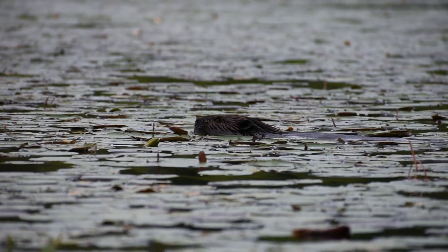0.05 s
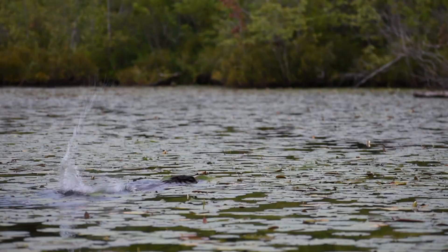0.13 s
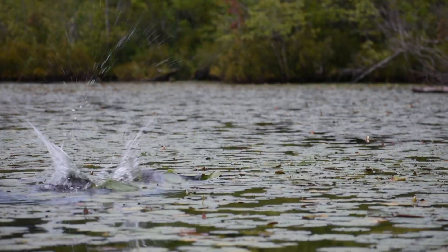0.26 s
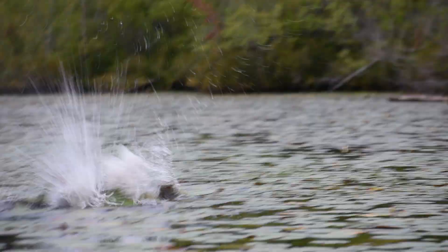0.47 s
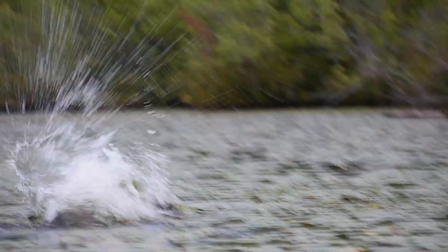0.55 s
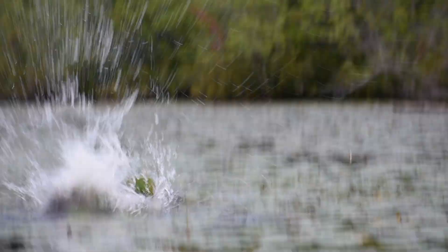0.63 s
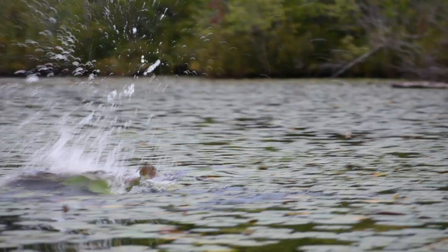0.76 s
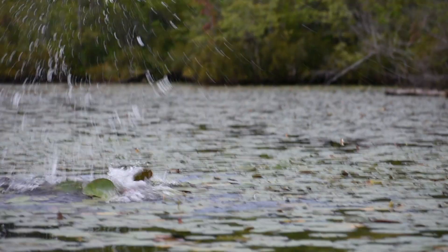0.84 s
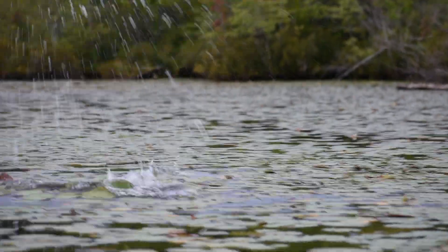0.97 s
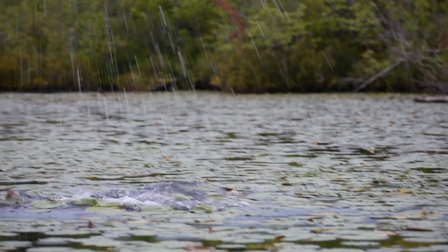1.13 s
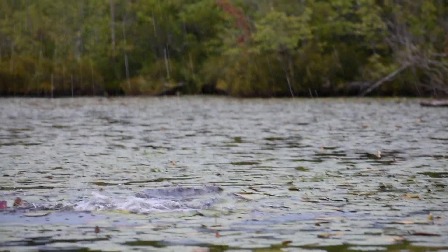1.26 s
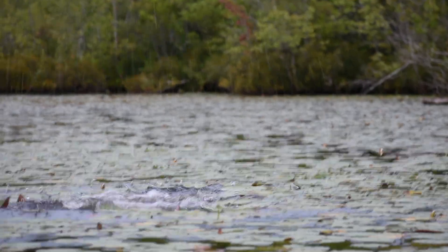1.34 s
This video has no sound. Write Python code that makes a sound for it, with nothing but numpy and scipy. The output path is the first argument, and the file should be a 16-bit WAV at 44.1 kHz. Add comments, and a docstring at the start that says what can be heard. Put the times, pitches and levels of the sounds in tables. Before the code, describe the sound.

A loud, sharp smack on water as a beaver's tail hits a quiet lake, heard on a single microphone. Spray hisses briefly, then the diving body splashes, and churning bubbles fade into a light patter of droplets.

```python
"""A still lake, with faint insects and shore air behind, heard on one microphone.
A beaver slaps its tail on the water: a crack that drops into a hollow pop as air is squeezed from under
the tail, then a hiss of flung spray. It plunges: the water thumps, churns with ringing bubbles and falls
back, thinning to single chirping drops. The slap is just loud enough to overload the recorder."""
import sys
import numpy as np
from scipy import signal
from scipy.fft import rfft, irfft, next_fast_len
from scipy.io import wavfile

SR = 44100
rng = np.random.default_rng(int(sys.argv[2]) if len(sys.argv) > 2 else 0)


def dump(signal):
    """Clip the signal to [-1, 1] and save it as 16-bit WAV at the path in sys.argv[1]."""
    limited = np.clip(np.atleast_2d(signal).T, -1, 1)
    pcm = np.round(limited * 32767).astype(np.int16)
    wavfile.write(sys.argv[1], SR, pcm)


N = 61739

PLUNGE_S, PLUNGE_RISE_S = 0.462, 0.0029
TOP_HZ = 16100  # the recorder's band limit


def slap():
    """The flat tail hits: a crack, a clap, and squeezed air falling to the trapped pocket's note."""
    crack_colour = [(100, -22), (400, -1.5), (2200, -7), (4500, -1), (7000, -2), (10000, -12),
                    (12700, -6.5), (16000, -19)]  # spectrum of the impact (frequency [Hz], level [dB])
    pop_s, pop_rise_s, pop_fall_s = 0.2295, 0.0015, 0.0025
    pocket_hz, squeeze_hz, squeeze_fall_s = 664, 122, 0.00052
    crack_s, crack_rise_s, crack_fall_s = 0.2278, 0.0012, 0.0021
    clap_s, clap_hz, clap_width_s = 0.2286, 2080, 0.00059

    t = np.clip(clock() - pop_s, -0.004, 0.05)
    excess_hz = squeeze_hz * np.exp(-t / squeeze_fall_s)  # pitch above the pocket's note
    swell = np.exp(-(t / np.where(t < 0, pop_rise_s, pop_fall_s)) ** 2)
    gate = (excess_hz < TOP_HZ) * (clock() > pop_s + t[0])
    pop = swell * gate * np.sin(2 * np.pi * (pocket_hz * t - excess_hz * squeeze_fall_s))

    t = clock() - crack_s
    burst = np.exp(-np.where(t < 0, (t / crack_rise_s) ** 2, t / crack_fall_s))
    crack = burst * noise(crack_colour)

    t = clock() - clap_s
    clap = np.cos(2 * np.pi * clap_hz * t) * np.exp(-(t / clap_width_s) ** 2)
    return highpass(amp(-2.6) * pop + amp(-2.5) * clap + amp(-8) * crack, edge_hz=260)


def splash():
    """The body goes under with a crash; thrown water falls back as large and small bubbles and spray."""
    # relative levels of the churning water (time [s], large bubbles [dB], small bubbles [dB], spray [dB])
    surges = [(0.46, -44, -21.5, -29), (0.47, -23.5, -19.5, -21.5), (0.482, -36, -24, -29),
              (0.526, -31, -26, -31), (0.566, -37.5, -29.5, -39.5), (0.584, -31, -31, -38.5),
              (0.636, -37, -35, -39), (0.648, -31, -32.5, -38.5), (0.688, -34.5, -32, -34),
              (0.746, -32.5, -31, -37), (0.782, -40, -32.5, -35.5), (0.888, -41, -30.5, -33.5),
              (0.968, -42.5, -31, -35.5), (1.018, -44, -34.5, -35.5), (1.034, -48, -36.5, -40),
              (1.086, -45.5, -34, -36), (1.28, -54.5, -46.5, -45), (1.4, -50.5, -41.5, -40)]
    # spectra of the same three layers (frequency [Hz], level [dB])
    large_colour = [(60, -45), (130, -18.5), (240, -11), (380, -4.5), (520, -5.5), (730, 3.5), (900, -3),
                    (1300, -25), (2500, -62)]
    small_colour = [(400, -55), (750, -12), (1000, 0), (1700, 2), (2300, -3), (3000, -6), (4200, -16),
                    (8000, -50)]
    spray_colour = [(1400, -51), (2500, -6), (3300, 2), (4500, -0.5), (6700, -2), (9500, -10), (12500, -17),
                    (16000, -27)]
    # the crash starts as an even wash; single bubbles stand out only later
    wash_share = np.exp(-np.maximum(clock() - PLUNGE_S, 0) / 0.082)

    def churn(colour, **cloud):
        return np.sqrt(1 - wash_share) * bubbles(colour, **cloud) + np.sqrt(wash_share) * noise(colour)

    large = churn(large_colour, low_hz=219.6, high_hz=968, cycles=2.27, scatter=2, wash_db=5, count=900)
    small = churn(small_colour, low_hz=866, high_hz=3310, cycles=2.8, scatter=3, wash_db=0, count=1500)
    spray = churn(spray_colour, low_hz=2574, high_hz=13800, cycles=2.2, scatter=5.5, wash_db=-2.5,
                  count=3500)
    large_db, small_db, spray_db = curves(surges)
    water = amp(large_db + 0.5) * large + amp(small_db - 1) * small + amp(spray_db - 0.5) * spray
    return water * fade_in(PLUNGE_S, PLUNGE_RISE_S)


def gulps():
    """Lumps of water close with a wet smack over big pockets of air, which ring briefly."""
    # trapped air (time [s], starting pitch [Hz], level [dB], decay [s], smack relative to ring [dB])
    pockets = [(.2855, 760, -25.5, 0.0019, -8.5), (.379, 497, -28, 0.0037, -21),
               (.3912, 760, -13.5, 0.0018, -17), (.399, 1100, -24, 0.0024, -26),
               (.404, 1220, -13, 0.00075, -14), (.462, 345, -25.5, 0.015, -19),
               (.533, 399, -27, 0.015, -22), (.583, 816, -20, 0.0076, -14), (.611, 937, -19.5, 0.0049, -10),
               (.7386, 1164, -11.5, 0.0018, -26), (.737, 641, -22, 0.0093, -10),
               (0.812, 1550, -32, 0.0017, 13), (.881, 1760, -21, 0.0067, -13),
               (.9255, 2220, -23.5, 0.0025, 4), (.9555, 1140, -22.5, 0.0051, -6),
               (1.005, 596, -33, 0.024, -5), (1.123, 2820, -24, 0.0025, 4),
               (1.1686, 1130, -25, 0.0037, 2.5), (1.208, 3480, -28, 0.00091, 3.5),
               (1.373, 1070, -21.5, 0.001, -11)]
    smack_colour = [(200, -24), (700, -7.5), (1600, 1), (4000, 1.5), (7000, -5), (10000, -18), (16000, -26)]  # spectrum of the wet smack (frequency [Hz], level [dB])
    rise_per_s, attack_s, smack_decay_s = 2.8, 0.00045, 0.0024
    out, smack_noise = np.zeros(N), noise(smack_colour)
    for start_s, hz, db, decay_s, smack_db in pockets:
        t = np.maximum(clock() - start_s, 0)
        ring = np.sin(2 * np.pi * hz * t * (1 + rise_per_s * t / 2)) * np.exp(-t / decay_s)
        smack = amp(smack_db) * smack_noise * np.exp(-t / smack_decay_s)
        out += amp(db) * (ring + smack) * (1 - np.exp(-t / attack_s))
    return highpass(out, edge_hz=217)


def drops():
    """Single drops chirp, a few around the slap and most after the splash, over a finer patter."""
    # drops that stand out (time [s], pitch [Hz], level [dB], length [cycles])
    single_drops = [(0.2145, 6200, -22, 1.5), (0.2201, 3760, -42, 0.92), (.3515, 3270, -26, 2.9),
                    (.433, 7250, -22.5, 4.1), (0.901, 8900, -12.5, 1.8), (0.9353, 7400, -16, 3),
                    (1.079, 5500, -11, 0.67), (1.1525, 9000, -26, 3.7), (1.1845, 6200, -24, 5.7),
                    (1.191, 10100, -32, 5), (1.1998, 8950, -27, 5.6), (1.2115, 6700, -26, 7.8),
                    (1.233, 10100, -22.5, 4.5), (1.258, 6300, -23.5, 4.4), (1.2855, 9600, -26, 8.7),
                    (1.309, 8550, -28, 8.6), (1.3214, 3700, -21.5, 7.2), (1.335, 5906, -23.5, 6.8),
                    (1.3475, 7250, -25, 6.4), (1.3619, 11300, -20, 6), (1.3643, 11200, -28, 6),
                    (1.3899, 10600, -23, 8.4), (1.3912, 4560, -20, 2.2)]
    patter_levels = [(0.699, -51), (1.0, -34.5), (1.15, -31.5), (1.25, -31.5), (1.4, -29.5)]  # the smaller drops (time [s], typical level [dB])
    drops_per_s, typical_hz, cycles, scatter_db = 190, 8900, 4.6, 4
    times, levels = np.transpose(patter_levels)
    count = int(drops_per_s * (times[-1] - times[0]))
    pitch, size, jitter = rng.standard_normal((count, 3)).T
    landing_s = times[0] + (np.arange(count) + jitter) / drops_per_s
    db = np.interp(landing_s, times, levels) + scatter_db * np.minimum(size, 2)
    patter = chirps(landing_s, typical_hz * np.exp(0.39 * pitch), db, np.full(count, cycles))
    return patter + chirps(*np.transpose(single_drops))


def flung_spray():
    """Fine spray thrown by the tail hisses between the slap and the plunge."""
    flurries = [(0.238, -32.5), (0.248, -37.5), (0.374, -44), (0.404, -35), (0.414, -43.5), (0.434, -42.5),
                (0.44, -42), (0.455, -40.5)]  # spray in flight (time [s], relative level [dB])
    colour = [(88, -49), (150, -8), (774, 4.5), (2920, 0), (3220, -1.5), (7620, -3.5), (8730, -9),
              (12900, -11.5), (16000, -18)]  # spectrum of its hiss (frequency [Hz], level [dB])
    level_db, = curves(flurries)
    fizz = bubbles(colour, low_hz=693, high_hz=12400, cycles=3.1, scatter=4.5, wash_db=1.5, count=4000)
    gate = fade_in(0.222, rise_s=0.0015) * (1 - fade_in(PLUNGE_S, PLUNGE_RISE_S))
    return amp(level_db + 0.5) * fizz * gate


def mist():
    """The finest droplets come down as a soft, high sizzle."""
    showers = [(0.46, -48), (0.466, -42), (0.564, -47), (0.892, -47.5), (0.9, -26), (0.912, -44),
               (1.22, -49), (1.236, -43), (1.24, -47.5), (1.394, -43), (1.4, -45)]  # falling mist (time [s], relative level [dB])
    colour = [(4000, -40), (7000, 9), (9000, -8.5), (10500, -3.5), (12500, 2), (14500, -3.5), (16000, -14)]  # spectrum of its sizzle (frequency [Hz], level [dB])
    level_db, = curves(showers)
    fizz = bubbles(colour, low_hz=6840, high_hz=14900, cycles=3.2, scatter=4.5, wash_db=0, count=3000)
    return amp(level_db - 1.5) * fizz * fade_in(PLUNGE_S, PLUNGE_RISE_S)


def hollow():
    """The cavity behind the diving body thumps and closes with a rising note."""
    cavity = [(.462, 79.6, -50), (.478, 65, -42), (.52, 60, -56), (.57, 74, -58), (.605, 127, -53),
              (.635, 218, -60), (.72, 295, -62), (.78, 332, -64)]  # the cavity's note (time [s], pitch [Hz], level [dB])
    hz, level_db = curves(cavity)
    closed_s = cavity[-1][0]
    gate = fade_in(PLUNGE_S, PLUNGE_RISE_S) * (1 - fade_in(closed_s, rise_s=0.016))
    return gate * amp(level_db) * np.sin(2 * np.pi * np.cumsum(hz) / SR)


def shore():
    """Quiet air and a thin, steady band of insects lie in the background."""
    # spectra of the shore air and the insects (frequency [Hz], level [dB])
    air_colour = [(25, -14), (60, -12.5), (110, -16.5), (185, -3), (280, -4.5), (800, -5), (1500, -7.5),
                  (4000, -14.5), (8000, -17), (13000, -23), (16000, -30)]
    insect_colour = [(4300, -28), (5350, -3), (5850, 1), (6300, -16), (6900, -13), (7500, -13), (8500, -43)]
    return amp(-51) * noise(air_colour) + amp(-58.5) * noise(insect_colour)


def bubbles(colour, low_hz, high_hz, cycles, scatter, wash_db, count):
    """A cloud of short ringing bubbles that rise in pitch, on a wash of noise; rms 1."""
    jitter, pitch, faintness, phase = rng.random((count, 4)).T[:, :, None]
    hz = low_hz * (high_hz / low_hz) ** pitch
    length = int(min(4 * cycles / low_hz, 0.04) * SR)
    age = hz * np.arange(length) / SR  # in cycles
    glide = 1 + 0.11 * np.tanh(age / cycles / 2)
    envelope = np.exp(-age / cycles) * (1 - np.exp(-2 * age))
    rings = np.sin(2 * np.pi * (age * glide + phase)) * envelope
    gains = hz * amp(-scatter * np.log(faintness + 0.025))  # a few loud bubbles among many faint ones
    starts = (np.arange(count) + 2 * jitter[:, 0]) / count * N / SR
    cloud = placed(starts, rings * gains)
    return coloured(unit(cloud) + amp(wash_db) * rng.standard_normal(N), colour)


def chirps(landing_s, hz, db, cycles):
    """Each drop swells and fades within a few cycles while its pitch shoots up."""
    rise_per_cycle = 0.062
    t = np.arange(-SR // 200, SR // 200) / SR
    age = hz[:, None] * t  # in cycles from the loudest moment
    pitch_ratio = np.exp(np.clip(rise_per_cycle * age, -10, 2))
    in_band = np.clip((TOP_HZ - hz[:, None] * pitch_ratio) / 2500, 0, 1)
    envelope = in_band / np.cosh(2 * age / cycles[:, None])
    waves = envelope * np.sin(2 * np.pi * pitch_ratio / rise_per_cycle)
    return placed(landing_s + t[0], amp(db)[:, None] * waves)


def amp(db):
    """Decibels to gain."""
    return 10 ** (np.asarray(db) / 20)


def unit(x):
    """Scale to rms 1."""
    return x / np.sqrt(np.mean(x ** 2) + 1e-20)


def clock():
    """The time of each sample in seconds."""
    return np.arange(N) / SR


def curves(rows):
    """One value per sample for each column after the time."""
    times, *columns = np.transpose(rows)
    return [np.interp(clock(), times, column) for column in columns]


def fade_in(centre_s, rise_s):
    """A smooth step from 0 to 1 around centre_s."""
    return 0.5 + 0.5 * np.tanh((clock() - centre_s) / rise_s)


def placed(starts, waves):
    """Sum short waves, one a row, at their start times."""
    index = np.round(starts * SR).astype(int)[:, None] + np.arange(waves.shape[1])
    return np.bincount(np.clip(index, 0, N).ravel(), waves.ravel(), N + 1)[:N]


def filtered(x, response):
    """Multiply the spectrum of x by response(hz)."""
    size = next_fast_len(N + SR // 2)
    return irfft(rfft(x, size) * response(np.fft.rfftfreq(size, 1 / SR)), size)[:N]


def coloured(x, colour):
    """Shape x by (frequency [Hz], level [dB]) points; rms 1."""
    points_hz, db = np.transpose(colour)
    return unit(filtered(x, lambda hz: amp(np.interp(np.log(hz + 1), np.log(points_hz), db))))


def noise(colour):
    """Coloured noise of rms 1."""
    return coloured(rng.standard_normal(N), colour)


def highpass(x, edge_hz):
    """A causal second-order high-pass."""
    return signal.sosfilt(signal.butter(2, edge_hz, "highpass", fs=SR, output="sos"), x)


def scene():
    """Lake and shore reach one microphone, the same in both channels."""
    mono = slap() + flung_spray() + splash() + mist() + hollow() + gulps() + drops() + shore()
    return np.array([mono, mono])


def record(dry):
    """The recorder clips the slap, cuts the deepest bass and keeps nothing above its band limit."""
    overload, bass_cut_hz = 1.1, 71
    band = lambda hz: (hz < TOP_HZ) * (1 - np.exp(-(hz / bass_cut_hz) ** 4))
    return np.array([filtered(np.clip(channel, -overload, overload), band) for channel in dry])


dry = scene()
out = record(dry)
dump(out)
```